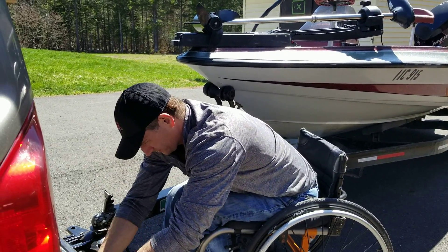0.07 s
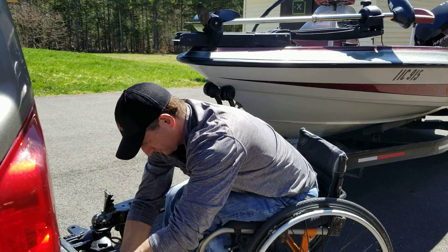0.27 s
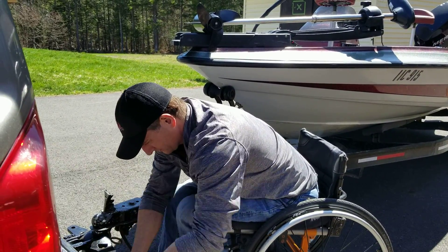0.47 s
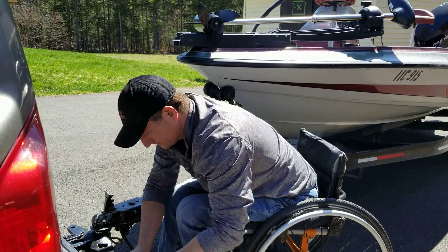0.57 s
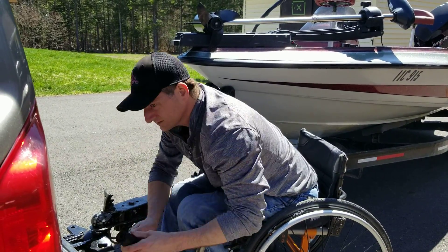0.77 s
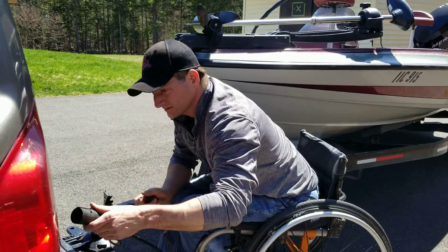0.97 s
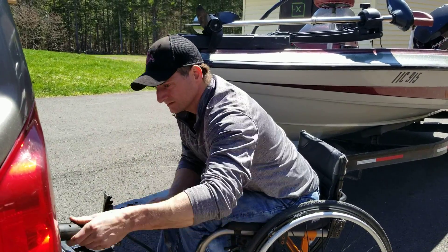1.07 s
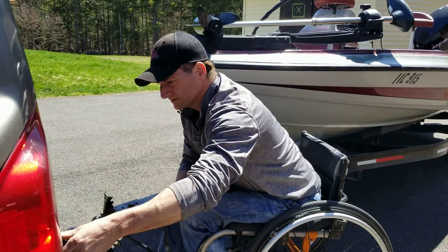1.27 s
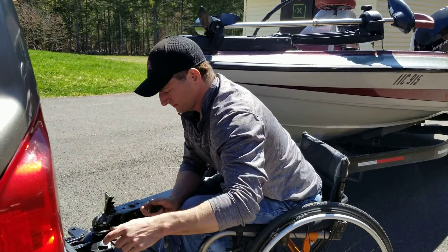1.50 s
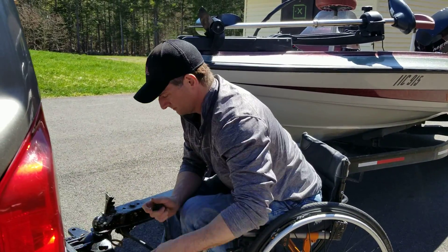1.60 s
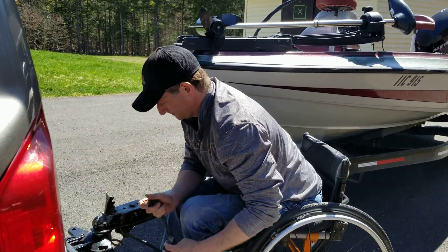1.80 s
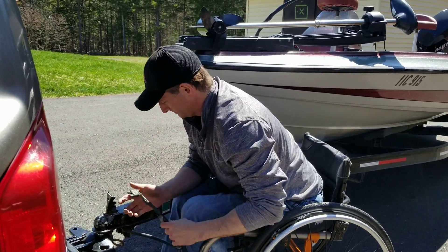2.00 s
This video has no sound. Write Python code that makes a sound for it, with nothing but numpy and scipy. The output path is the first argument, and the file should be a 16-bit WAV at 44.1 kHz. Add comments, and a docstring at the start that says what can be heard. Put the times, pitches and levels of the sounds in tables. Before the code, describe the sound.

A steel trailer hitch latch clicks lightly, then snaps with a short heavy clank; sleeves rustle, small parts tick, and a pipe knocks and scrapes on a hollow bumper. Open driveway, close small stereo microphone, low distant hum.

```python
"""Outdoors on a driveway: filtered noise makes distant traffic and air hum throughout, soon joined by rustling sleeves.
A steel hitch latch clicks, then snaps home with a clank: blows ring lever and shell modes, noise tails follow.
Small parts tick in the hands (noise bursts) and a faint, nearly steady 3.4 kHz whistle sounds (wobbling sine).
A short pipe is then laid on a car bumper, knocking and scraping its modes, as wind puffs on the ports; last,
a far bird chirps once, rising (gliding sine)."""
import sys
import numpy as np
from scipy import signal
from scipy.fft import rfft, irfft
from scipy.io import wavfile
from scipy.ndimage import uniform_filter1d, map_coordinates

SR = 44100
rng = np.random.default_rng(int(sys.argv[2]) if len(sys.argv) > 2 else 0)


def field_ratio(decibels):
    """Amplitude ratio for a level in dB (20 dB per decade); scalars and array-likes work."""
    return 10 ** (np.asarray(decibels, dtype=float) / 20)


def put_to_file(sound):
    """Save the sound as 16-bit audio at rate SR, in the file named by the first command-line argument."""
    columns = np.atleast_2d(sound).T  # one column per channel
    safe = np.clip(columns, -1, 1)
    whole_steps = np.round(safe * 32767)
    wavfile.write(sys.argv[1], SR, whole_steps.astype(np.int16))


N = 90404  # samples


def unit(x):
    """Scale to rms 1."""
    return x / np.sqrt(np.mean(x ** 2))


def butter(x, order, hz, kind):
    """Causal Butterworth filter."""
    return signal.sosfilt(signal.butter(order, hz, kind, fs=SR, output="sos"), x)


def colour(x, table):
    """Filter by (Hz, dB) points; the mirrored copy keeps both ends smooth."""
    f = np.fft.rfftfreq(2 * N, 1 / SR) + 1
    hz, db = np.array(table, float).T
    gain = field_ratio(np.interp(np.log(f), np.log(hz), db))
    mirrored = np.concatenate([x, x[..., ::-1]], axis=-1)
    return irfft(rfft(mirrored) * gain)[..., :N]


def curve(rows, column=1):
    """Straight lines between the rows' levels over time."""
    rows = np.array(rows, float)
    return np.interp(np.arange(N) / SR, rows[:, 0], rows[:, column])


def walk(rate_hz):
    """Random levels held 1 / rate_hz seconds and slewed twice; rms 1."""
    hold = int(SR / rate_hz)
    steps = np.repeat(rng.standard_normal(N // hold + 1), hold)
    return unit(uniform_filter1d(uniform_filter1d(steps, hold), hold)[:N])


def spikes(times_s, dbs):
    """One-sample blows."""
    x = np.zeros(N)
    np.add.at(x, (np.asarray(times_s) * SR).astype(int), field_ratio(dbs))
    return x


def grains(per_s, spread_db):
    """Random contacts of uneven size and sign; rms 1."""
    chance = rng.random(N)
    size = field_ratio(spread_db * rng.exponential(size=N))
    sign = np.sign(rng.standard_normal(N))
    return unit((chance < per_s / SR) * size * sign)


def ring(blows, jiggle, modes):
    """Blows strike all modes together; jiggling reaches each mode at its own random places."""
    out = 0
    for hz, db, t60_s in modes:
        pole = np.exp(2j * np.pi * hz / SR - np.log(1000) / (t60_s * SR))
        push = blows + jiggle * rng.standard_normal(N)
        out = out + field_ratio(db) * signal.lfilter([1], [1, -pole], push).imag
    return out


def fade(x, t60_s):
    """Exponential decay after each blow."""
    return signal.lfilter([1], [1, -np.exp(-np.log(1000) / (t60_s * SR))], x)


# Spectrum of the air. Each row: Hz, density in relative dB per Hz.
AIR_COLOUR = [(30, -1.5), (65, 2), (140, -11), (200, -20), (380, -16.5), (750, -15.5), (2200, -50),
              (5000, -58), (16000, -44.5)]
# Stereo width of the air. Each row: Hz, side minus mid in dB.
AIR_WIDTH = [(60, -15.5), (300, -10), (1300, 8.5), (16000, -2.5)]
# Wind buffeting the ports. Each row: time in seconds, left level in dB, right level in dB.
WIND_LEVEL = [(1.35, -70.5, -65.5), (1.48, -33, -35), (1.64, -48, -76), (2.05, -54.5, -57)]
AIR_DB = -46


def air():
    """Far traffic and breeze: lurching bass rumble, slightly flickering hiss, wind puffs on each port alone."""
    mid, side = colour(rng.standard_normal((2, N)), AIR_COLOUR)
    side = colour(side, AIR_WIDTH)
    both = unit(np.array([mid + side, mid - side]))
    rumble = signal.sosfiltfilt(signal.butter(2, 130, fs=SR, output="sos"), both)
    hiss = both - rumble
    rumble = rumble * field_ratio(2.2 * walk(12))
    hiss = hiss * field_ratio(0.8 * walk(14))
    gusts = unit(butter(rng.standard_normal((2, N)), 2, [40, 140], "band"))
    gusts = gusts * field_ratio(np.array([curve(WIND_LEVEL), curve(WIND_LEVEL, column=2)]))
    return gusts + (rumble + hiss) * field_ratio(AIR_DB)


# A faint, nearly steady whistle, then a far bird's rising chirp.
# Each row: start in seconds, length in seconds, from Hz, to Hz, peak level in dB.
WHISTLES = [(1.166, 0.12, 3400, 3450, -73), (1.895, .2, 4100, 5100, -77)]


def whistle_and_bird():
    """Thin, breathy tones: sines with random pitch wobble, the first nearly steady, the bird's gliding up."""
    out, t = 0, np.arange(N) / SR
    for start_s, length_s, from_hz, to_hz, db in WHISTLES:
        progress = np.clip((t - start_s) / length_s, 0, 1)
        hz = (from_hz + (to_hz - from_hz) * progress) * (1 + 0.024 * walk(300))
        tone = np.sin(2 * np.pi * np.cumsum(hz) / SR)
        out = out + np.sin(np.pi * progress) * field_ratio(db) * tone
    return out


# Sleeves rustling. Each row: time in seconds, level in dB.
RUSTLE_LEVEL = [(.165, -98.5), (.185, -58.5), (.25, -51.5), (.33, -62.5), (.48, -57), (.58, -59.5),
                (.63, -54), (.85, -63.5), (1.1, -76), (1.2, -65), (1.6, -75), (1.9, -89), (2.05, -63)]
# Spectrum of the cloth. Each row: Hz, density in relative dB per Hz.
RUSTLE_COLOUR = [(1500, -11), (4000, 2.5), (12000, 4), (16000, 5)]
# Small ticks of parts in the hands. Each row: time in seconds, level in dB, pitch of the band in Hz.
FUMBLES = [(0.676, -52.5, 6660), (0.7286, -53, 6740), (0.813, -59.5, 4560), (1.1414, -57, 4300),
           (1.176, -62.5, 3680), (1.261, -62, 3600)]


def hands():
    """Sleeves rustle as shaped noise; small parts tick as short band-passed noise bursts."""
    cloth = unit(colour(rng.standard_normal((2, N)), RUSTLE_COLOUR))
    ticks = 0
    for s, db, hz in FUMBLES:
        noise = unit(butter(rng.standard_normal(N), 1, [hz / 2, min(hz * 2.1, 16000)], "band"))
        ticks = ticks + fade(spikes([s], [db]), 0.045) * noise
    return cloth * field_ratio(curve(RUSTLE_LEVEL)) + ticks


# Hollow bumper modes. Each row: Hz, relative level in dB, t60 in seconds.
BUMPER_MODES = [(174.4, -7, 0.12), (267, 0, 0.047), (346, 5, 0.055), (552, -0.5, 0.028), (731.5, -1, 0.026),
                (891, 5, 0.025), (1032, 5, 0.012), (1340, 0.5, 0.025), (1631, 1, 0.013)]
# Pipe knocking on the bumper. Each row: time in seconds, then relative levels in dB of knock, boom,
# dull tick and bright tick.
KNOCKS = [(1.304, -46.5, -44, -58, -54), (1.327, -27, -52, -46, -36.5), (1.3507, -33, -30, -33.5, -48),
          (1.364, -26.5, -41, -31.5, -38), (1.371, -26.5, -40.5, -41, -49),
          (1.4083, -30.5, -35, -40.5, -48), (1.4198, -32, -32.5, -37, -60), (1.4445, -34, -39, -39.5, -32),
          (1.4564, -33.5, -34.5, -36.5, -21.5), (1.5007, -33, -39, -35.5, -32),
          (1.533, -32, -34.5, -44.5, -59)]
# Pipe scraping along the bumper. Each row: time in seconds, slip level in dB.
SCRAPE_LEVEL = [(1.28, -90.5), (1.33, -61.5), (1.43, -59.5), (1.485, -68), (1.515, -53), (1.6, -99)]
# Spectrum of a dull contact. Each row: Hz, density in relative dB per Hz.
TICK_COLOUR = [(1200, -12.5), (2200, 4), (8000, -9), (16000, -19)]
BOOM_HZ = 450  # modes below are the boom of the whole panel, those above its knock
SLIPS_PER_S, GRIT_DB = 700, 7  # GRIT_DB: hiss of the rubbing above the slip level
JUDDER_T60_S = 0.074  # each knock is a short run of contacts


def pipe_on_bumper():
    """Knocks and stick-slip scraping ring the bumper; every contact has a dry tick."""
    s, knock_db, boom_db, dull_db, bright_db = np.array(KNOCKS).T
    slip = grains(SLIPS_PER_S, spread_db=2.0) * field_ratio(curve(SCRAPE_LEVEL))
    knock_modes = [m for m in BUMPER_MODES if m[0] >= BOOM_HZ]
    boom_modes = [m for m in BUMPER_MODES if m[0] < BOOM_HZ]
    body = 0
    for db, modes in ((knock_db, knock_modes), (boom_db, boom_modes)):
        knocks = spikes(s, db)
        judder = 0.11 * fade(knocks, JUDDER_T60_S)
        body = body + ring(0.18 * knocks, judder + slip, modes)
    noise = rng.standard_normal((3, N))
    noise = noise[0] + 0.5 * noise[1:]  # partly shared by the channels
    dull = unit(colour(noise, TICK_COLOUR))
    bright = butter(noise, 2, [4800, 12000], "band")
    grit = dull * field_ratio(curve(SCRAPE_LEVEL) + GRIT_DB)
    dull_ticks = fade(spikes(s, dull_db), 0.052) * dull
    bright_ticks = fade(spikes(s, bright_db), 0.018) * bright
    return body + grit + dull_ticks + bright_ticks


# Crowded frame modes heard as a noisy tail. Each row: Hz, density in relative dB per Hz.
FRAME_COLOUR = [(300, -3), (1000, -8), (3300, -3), (16000, -21)]
FRAME_T60_S, FRAME_DAMP = 0.14, 0.2  # at 1 kHz; exponent of the fall with pitch


def frame(blows):
    """Octave bands of noise, each dying at its own rate; alike at both ports only in the bass."""
    noise, out = unit(colour(rng.standard_normal((2, N)), FRAME_COLOUR)), 0
    for hz in 300 * 2 ** np.arange(6):
        top_hz = hz * 2 ** 0.5 * (1 + (hz > 9000))  # top band is widened, up to 20 kHz
        mid, side = butter(noise, 2, [hz / 2 ** 0.5, min(top_hz, 20000)], "band")
        band = mid + min(hz / 2500, 1) * side * np.array([[1], [-1]])
        out = out + band * fade(blows, FRAME_T60_S * (1e3 / hz) ** FRAME_DAMP)
    return out


# Heavy coupler shell modes. Each row: Hz, relative level in dB, t60 in seconds.
SHELL_MODES = [(431.4, -21, 0.035), (620, -20, 0.026), (772, 4.5, 0.015), (911, 2.5, 0.03),
               (1136, -1.5, 0.011), (1500, -3.5, 0.0082)]
# Thin latch lever and spring modes. Each row: Hz, relative level in dB, t60 in seconds.
LATCH_MODES = [(4130, -8, 0.0095), (7040, 3, 0.0069), (8360, 3.5, 0.0054), (12700, -7, 0.012),
               (13680, -3.5, 0.0099)]
# Drawbar nodding slowly after a heavy blow. Each row: Hz, relative dB per pass, t60 per pass in seconds.
DRAWBAR_MODES = [(87, -31, 0.096)]
# Blows on the latch. Each row: time in seconds, latch strike in relative dB, shell strike in relative dB.
SNAPS = [(0.2160, -27.5, -50.5), (0.216, -27.5, -48), (.3670, -26, -15.5), (0.3685, -20, -16.5),
         (0.3751, -26.5, -32)]
CHATTER_PER_S, CHATTER_T60_S, CHATTER_DB = 1300, 0.057, -7.5  # loose parts jiggling after each blow
SIZZLE_DB, SIZZLE_T60_S, FRAME_DB = -9.5, 0.04, -6  # gains of the noisy tails after a blow


def hitch():
    """Each blow rings lever and shell, loose parts chatter, the drawbar nods, the frame hisses out."""
    s, latch_db, shell_db = np.array(SNAPS).T
    light, heavy = spikes(s, latch_db), spikes(s, shell_db)
    lever = butter(ring(0, fade(light, 0.0042) * 0.5, LATCH_MODES), 2, 3300, "high")
    chatter = grains(CHATTER_PER_S, spread_db=3) * field_ratio(CHATTER_DB) * np.sqrt(CHATTER_PER_S / SR)
    shell = ring(heavy, fade(heavy, CHATTER_T60_S) * chatter, SHELL_MODES)
    shell = butter(shell, 2, 220, "high")
    drawbar = ring(ring(heavy, 0, DRAWBAR_MODES), 0, DRAWBAR_MODES)  # two passes: swells, then dies
    bright = butter(rng.standard_normal((3, N)), 3, 3500, "high")
    bright = bright[0] + 2.4 * bright[1:]
    sizzle = bright * fade(light, SIZZLE_T60_S) * field_ratio(SIZZLE_DB)
    return lever + shell + drawbar + sizzle + field_ratio(FRAME_DB) * frame(heavy)


LAG_S, PAN_DB = 0.00015, 0.5  # the left port hears earlier and louder by
SCATTER_DB, SCATTER_T60_S, SCATTER_HZ = 1, 0.006, 1800  # treble thrown back by car and boat nearby


def place(x):
    """Two microphone ports: the left hears a little earlier; each gets its own scattered treble."""
    t = np.arange(N)
    near = []
    for port, side in zip(x, (1, -1)):
        shifted = map_coordinates(port, [t + side * LAG_S * SR / 2], mode="mirror")
        near.append(shifted * field_ratio(side * PAN_DB / 2))
    back = rng.standard_normal((2, 512)) * np.exp(-np.log(1000) * t[:512] / SR / SCATTER_T60_S)
    back = butter(back, 2, SCATTER_HZ, "high")
    back = back / np.sqrt(np.sum(back ** 2) / 2)
    return np.array(near) + field_ratio(SCATTER_DB) * signal.fftconvolve(x, back, axes=1)[:, :N]


YARD_T60_S, YARD_DB, YARD_DULL_HZ = 0.32, -21, 4033


def yard(x):
    """Diffuse outdoor echo: decaying low-passed noise after a 4 ms gap."""
    t = np.arange(SR // 2) / SR
    echo = rng.standard_normal((2, len(t))) * np.exp(-np.log(1000) * t / YARD_T60_S) * (t > 0.004)
    echo = signal.lfilter([1], [1, -np.exp(-2 * np.pi * YARD_DULL_HZ / SR)], echo)
    echo = echo / np.sqrt(np.sum(echo ** 2) / 2)
    return field_ratio(YARD_DB) * signal.fftconvolve(x, echo, axes=1)[:, :N]


def scene():
    """Metal sounds are placed and echoed; the rest is added as it is."""
    metal = hitch() + pipe_on_bumper()
    return place(metal) + yard(metal) + hands() + whistle_and_bird() + air()


# Small microphone response. Each row: Hz, gain in dB.
MIC_RESPONSE = [(20, -22), (55, 0), (8200, -3), (9200, -11.5), (11000, -2.5), (15500, -6), (16200, -20)]


def top_cut(x):
    """Nothing passes above the cut-off."""
    return signal.sosfilt(signal.butter(12, 16810, fs=SR, output="sos"), x)


def record(dry):
    """Small microphone colours the mix."""
    mix = colour(dry, MIC_RESPONSE)
    return top_cut(mix)


dry = scene()
out = record(dry)
put_to_file(out)
```